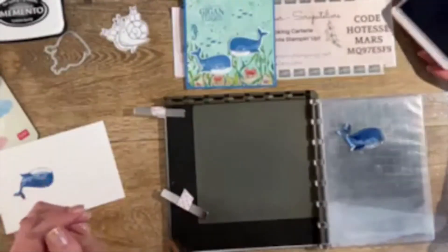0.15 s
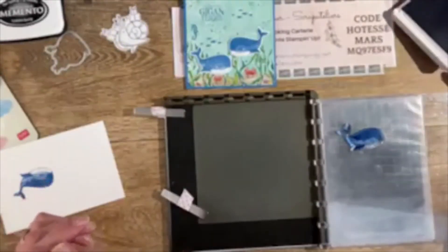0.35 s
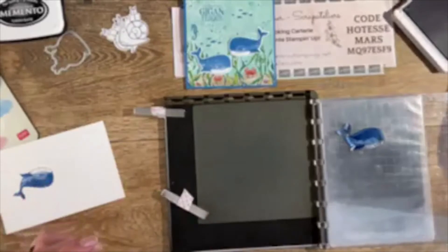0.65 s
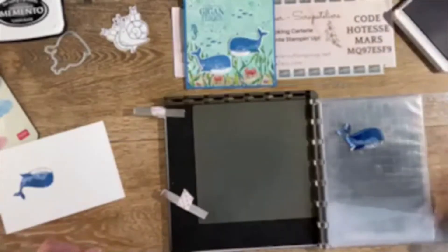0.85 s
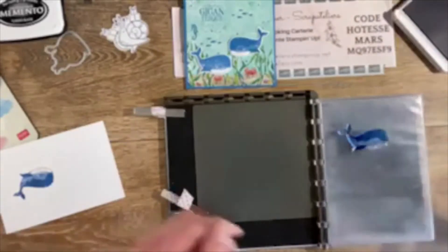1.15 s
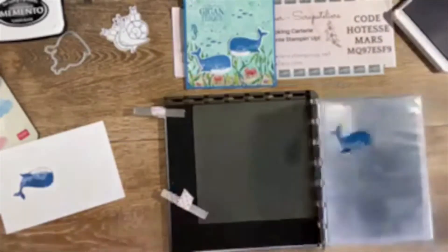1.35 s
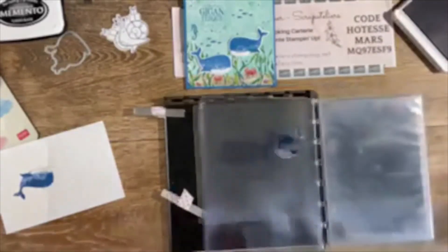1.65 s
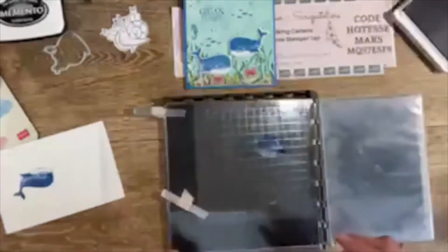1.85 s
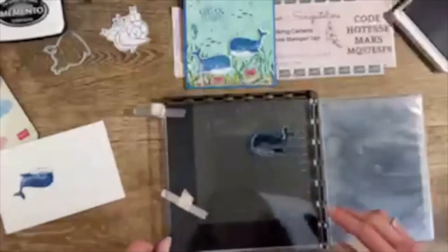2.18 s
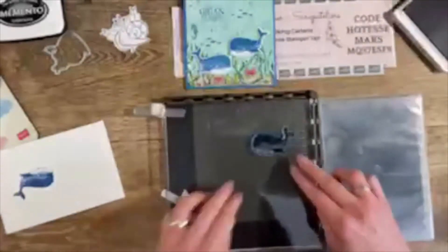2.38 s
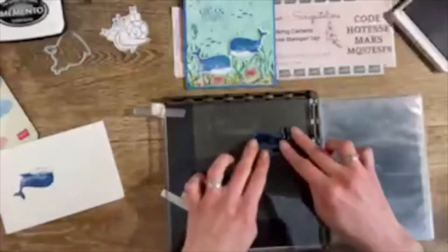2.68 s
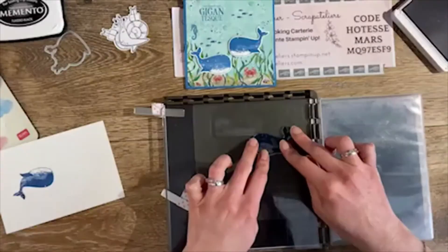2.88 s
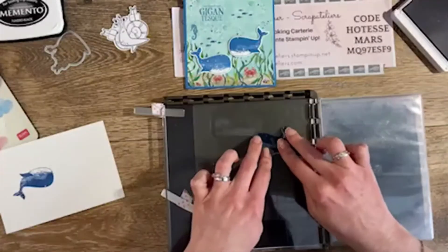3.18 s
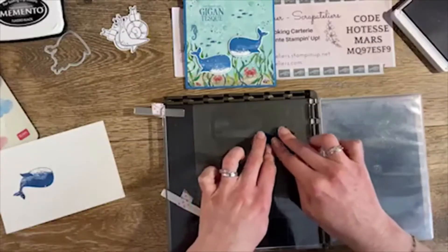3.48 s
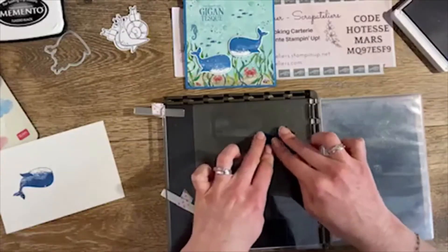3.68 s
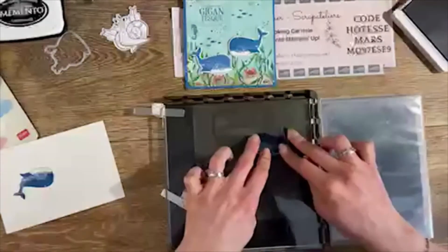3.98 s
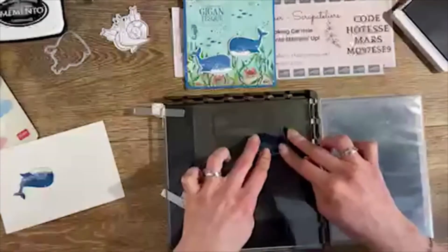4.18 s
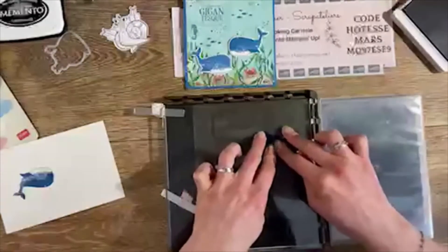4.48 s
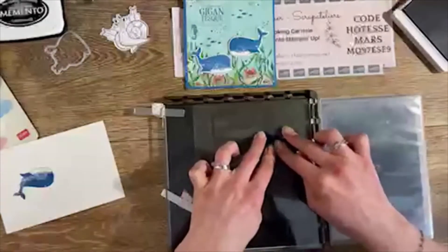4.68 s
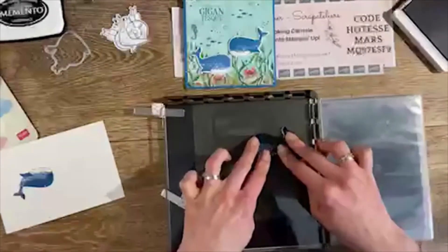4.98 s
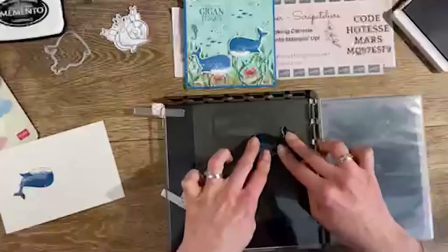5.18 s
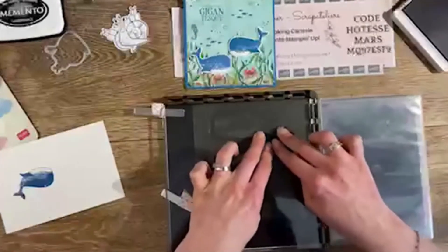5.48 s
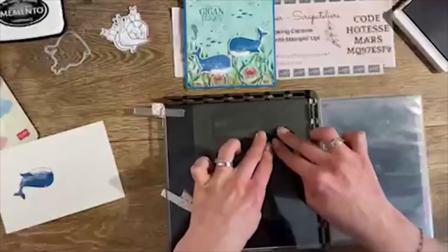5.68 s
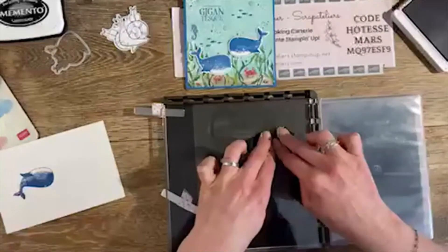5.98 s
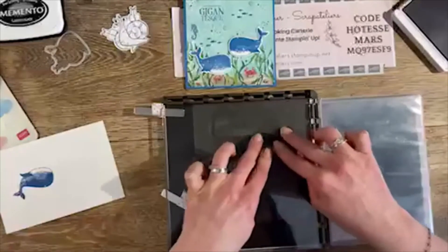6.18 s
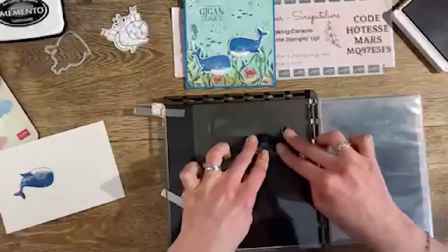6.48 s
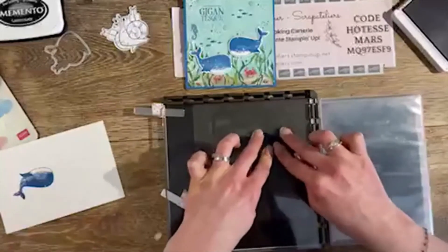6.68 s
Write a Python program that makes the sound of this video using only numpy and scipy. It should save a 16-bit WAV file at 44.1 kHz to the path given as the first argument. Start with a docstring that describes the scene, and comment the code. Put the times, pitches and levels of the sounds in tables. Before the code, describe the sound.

Three hard plastic clacks tap onto rubber with a low table thump, then a sticky hiss and faint fingertip ticks in a quiet room.

```python
"""Ink pad and stamping platform

On a wooden table in a small room, an ink pad in a plastic case is tapped three times onto a rubber stamp.
Damped modes make the case's clack and the table's thump; dense noise bursts fill in the crack of each blow.
The pad peels off with a grainy hiss and is set aside; fingertips press the folded lid with ticks, soft bumps,
creaks and slides. Room noise lies under it all, and a small microphone loses the deepest bass."""
import sys
import numpy as np
from scipy import signal
from scipy.fft import rfft, irfft
from scipy.io import wavfile

SR = 44100
rng = np.random.default_rng(int(sys.argv[2]) if len(sys.argv) > 2 else 0)


def materialize(psi):
    """Save the field psi as 16-bit PCM at rate SR to the path in sys.argv[1].

    A 1-D psi becomes a single channel; in a 2-D psi each row is a channel.
    """
    bounded = np.clip(np.atleast_2d(psi).T, -1, 1)
    quanta = np.round(bounded * 32767).astype(np.int16)
    wavfile.write(sys.argv[1], SR, quanta)


N = 301820
RING = np.arange(SR * 3 // 4) / SR  # time axis of one sound, s

# quiet noise of the room [f/Hz, relative density/dB per Hz]
AIR_COLOUR = [(20, -9), (45, -6), (70, 1), (105, 1.5), (160, -4), (290, -9), (390, -5), (520, -11),
              (900, -16.5), (2000, -22), (5000, -26), (7500, -27.5), (10000, -34), (16000, -40)]
AIR_DB = -68
# reverberation by band [f/Hz, t60/s, level against the sound fed to the room/dB]
ROOM_BANDS = [(100, 0.4, -7.5), (348, 0.35, -0.5), (970, 0.41, -8), (1800, 0.45, -12.5), (4001, 0.46, -12),
              (7900, .35, -13.5), (14000, .25, -16.5)]

# hands lean and shuffle on the table [middle t/s, length/s, level/dB]
RUMBLES = [(1.35, .36, -67.5), (1.7, .16, -66), (3.98, .15, -71), (4.36, .15, -64.5), (5.57, 0.1, -59),
           (5.78, 0.078, -67), (6.15, .08, -66)]
# the table's soft thud [f/Hz, level/dB]
THUD_COLOUR = [(35, -9), (70, 6), (110, 3), (160, 3), (260, -8), (450, -11), (1500, -78)]
# hands and plastic sliding [middle t/s, length/s, level/dB, hiss/dB]
SLIDES = [(.08, 1, -69.5, 7), (1.403, 0.26, -76, 1), (1.846, 0.41, -78, 7), (2.578, 0.11, -77, 15),
          (3.45, 0.23, -78, -5), (3.8, .2, -80.5, -12), (4.151, 0.19, -73.5, -15),
          (4.784, 0.092, -73, -21.5), (5.56, 0.17, -73.5, -6.5), (6.634, 0.19, -75, -6)]
# a fingertip's rub on the lid [f/Hz, level/dB]
RUB_COLOUR = [(400, -39), (850, -0.5), (1300, -3), (2000, -12), (2700, -13), (6000, -30), (12000, -50.5)]
# hiss of sliding plastic [f/Hz, level/dB]
HISS_COLOUR = [(1000, -18), (3000, -1), (7500, -0.5), (10000, -7.5), (15000, -8)]
# fingers drag on the lid in short creaks [start t/s, length/s, level/dB, treble/dB]
CREAKS = [(4.116, 0.051, -67.5, -14), (4.183, .028, -66, -17), (4.289, .035, -69.5, -8),
          (4.488, 0.012, -64, -2.5), (5.234, 0.037, -62.5, -12), (5.386, 0.034, -74, -14),
          (5.511, .022, -68, -3), (5.539, 0.0255, -61.5, 2), (5.752, 0.024, -67.5, -15),
          (6.179, 0.019, -61.5, -3), (6.613, 0.04, -64, -17)]
# resonances of the lid under a pressing finger [f/Hz, width/Hz, level/dB]
PRESSED_LID = [(880, 44, -3), (1000, 130, -4), (1176, 100, 9), (1616, 120, 0.5), (2050, 130, -10),
               (2570, 110, -4.5), (3460, 200, -17)]
SLIPS_PER_S = 530  # mean rate at which dragging skin slips

# clear bumps of hands and lid [t/s, level/dB, weight 0 grazing - 1 leaning]
BUMPS = [(1.624, -50, 0.23), (2.141, -58, 0.4), (2.892, -53, 0.33), (4.307, -67, 0.6), (5.035, -68, .62),
         (5.238, -58.5, 0.28), (5.55, -56.5, 0.35), (5.754, -64.5, 0.53), (5.861, -61.5, 0.35),
         (6.115, -59, 0.3), (6.565, -57.5, 0.26), (6.61, -52, 0.17)]
# the hands shift and settle [middle t/s, length/s, level of each small bump/dB, weight 0 - 1]
SHIFTS = [(1.323, 0.0199, -60.5, 0.28), (2.915, 0.029, -60.5, 0.48), (5.26, 0.0201, -64.5, 0.39),
          (5.46, .16, -68.5, 0.58), (6.698, 0.16, -69.5, 0.59)]
TOUCHES_PER_S = 16  # small bumps of a shifting hand, at least one per shift
# the platform's hollow knock [f/Hz, level/dB]
KNOCK_COLOUR = [(150, -21), (370, 8), (520, -1), (730, 0), (1100, -2), (3000, -62)]
WEIGHT_DB = 30  # weight trades rub for thud, over its whole range

# the tacky rubber crackles in small clear ticks [t/s, level/dB]
CRACKLES = [(3.224, -63), (3.237, -55.5), (3.264, -54), (3.287, -60), (3.298, -56), (3.405, -61),
            (3.475, -62)]
# tiny crackles between the clear ones [start t/s, length/s, level/dB, rate/per s]
FIZZ = [(3.23, 0.12, -78.5, 50), (3.394, .17, -74.5, 60)]
# clear ticks of plastic and fingernails [t/s, level/dB, hardness 0 fingertip - 1 nail tip]
TICKS = [(0.143, -47, 0.6), (0.3062, -42.5, 0.41), (1.037, -61, 0.38), (1.047, -58.5, 0.34),
         (1.175, -60, 0.1), (1.624, -53.5, 0.56), (2.538, -49, 1), (2.768, -52.5, 0.48),
         (2.785, -61.5, 0.54), (3.04, -59, 0.54), (3.05, -44, 0.45), (3.368, -57, 0.47),
         (3.449, -58, 0.053), (3.525, -60, 0.45), (3.938, -58, 0.039), (4.078, -61, 0.27),
         (4.087, -53.5, 0.18), (4.092, -58, 0.36), (4.113, -56.5, .25), (4.118, -55.5, .15),
         (4.479, -50, 0.03), (4.791, -61, .05), (4.948, -54.5, 0.04), (5.0954, -40.5, 0.43),
         (5.0998, -43.5, 0.47), (5.423, -67.5, 0.047), (6.204, -60.5, 0.052)]
# modes of the clear lid [f/Hz, t60/s, level/dB]
LID_MODES = [(897, 0.05, -5), (1180, 0.027, 4), (1375, 0.04814, -4.5), (1692, 0.018, 5.5),
             (1860, 0.034, -2), (2054, 0.046, -2)]
# thin high modes of the lid that a nail sets off [f/Hz, t60/s, level/dB]
LID_HIGH_MODES = [(3050, .035, -1), (4270, .03, -5.5), (4452, .03, -5.5), (5994, .03, -6),
                  (6800, 0.038, -6), (7900, .03, -5)]
SPOT_DETUNE = .035  # pitch spread between spots on the lid, share of each mode's pitch
# a nail's snap [f/Hz, level/dB]
SNAP_COLOUR = [(500, -16), (2200, -12), (3000, 1.5), (3700, -5.5), (4800, -3), (6800, -6), (9000, -15),
               (15000, -35)]
# crisp top of a hard contact [f/Hz, level/dB]
CRISP_COLOUR = [(4000, -22), (8000, -3.5), (11000, -5.5), (15000, -7)]
# a harder contact trades the lid's ring for snap, dB over the whole range of hardness
HARD_RING_DB, HARD_SNAP_DB, HARD_CRISP_DB = -17.5, 23, 30.5

# thin, high, beating chirps [t/s, f/Hz, level/dB, t60/s]
CHIRPS = [(0.1455, 5980, -40, 0.058), (4.478, 4160, -57, .045)]
# a chirp's close, beating partials [multiple of its pitch, level/dB]
CHIRP_PARTIALS = [(.975, -9), (1, -2), (1.035, -9)]
# the pad is set down, one corner after the other [t/s, level/dB, lowest ring f/Hz, treble/dB]
SET_DOWN = [(1.0585, -42, 560, -11), (1.0975, -43, 790, -1)]
# modes of a corner on the wood [multiple of the lowest ring, t60/s, level/dB]
CORNER_MODES = [(1, 0.019, 0), (1.25, .028, -7.5), (2.4, 0.021, -7), (4, .025, -13)]

PEEL_S = .769  # the pad lifts off the stamp, s
# strength of the lifting hiss [t/s, level/dB]
PEEL_LEVEL = [(.766, -85.5), (.772, -55), (.803, -55.5), (.85, -59), (.88, -64.5), (.94, -63.5), (.98, -76),
              (1.02, -100)]
# the hollow case colours the hiss as it lifts [f/Hz, width/Hz, level/dB]
PEEL_RINGS = [(819, 365, 0.5), (1158, 62, 9), (1798, 200, 2.5), (2590, 160, -2), (3120, 260, -2),
              (3720, 110, -12), (4445, 67, -3), (5590, 100, -8)]
# open hiss of the peel, and the noise that feeds the hollow case [f/Hz, level/dB]
PEEL_HISS = [(300, 0.5), (1200, -0.5), (3500, -5.0), (4500, -14), (7000, -8.5), (10000, -22), (15000, -25)]
PEEL_FEED = [(500, -3.5), (3500, 6), (9000, -3.5)]

# taps of the pad [t/s, level/dB, treble/dB, table thump/dB, strike place 0 flat - 1 on its edge]
TAPS = [(0.1093, -12.5, -10, -1, 0.013), (0.3183, -2.5, 1, -6, 0.92), (0.5403, 0, 0, 0.5, 0.22)]
# the case rebounds and rattles to rest [t/s, level/dB, treble/dB, table thump/dB, strike place 0 - 1]
REBOUNDS = [(0.1327, -22, -9.5, -10, 0), (0.1424, -25, -12, -6, .1), (0.156, -29, -16, -4, .1),
            (0.3329, -21, -11.5, -6, 0.1), (0.3996, -18, -8.5, -6, 0.82), (0.5678, -11.5, -1.5, 4, 0.3),
            (.5703, -6, -4, -8, 0.68), (0.5743, -16, -5, -10, 0.49), (0.5825, -14.5, -5, -10, 0.3),
            (0.5997, -21, -2, -10, 0.66)]
CONTACT_DB = -31.5  # crisp first touch, the same at every tap
# modes of the case on the stamp [f/Hz, t60/s, level struck flat/dB, level struck on its edge/dB]
CASE_MODES = [(367, 0.07, -17, -26.5), (428, 0.06, -22.5, -24), (522, 0.05, -22.5, -26.5),
              (747, .02, -25.5, -13), (935, 0.048, -17.5, -33), (1035, 0.064, -28.5, -35.5),
              (1310.5, 0.028, -25.5, -19.5), (1530, 0.024, -20, -18), (1695, 0.022, -20, -11),
              (1890, 0.047, -18, -25), (2061.4, 0.025, -20.5, -12.5), (2540, 0.056, -27.5, -30.5),
              (2923, 0.029, -25.5, -14.5), (3405, .022, -29.5, -20.5), (3250, 0.02, -26.5, -14.5),
              (4500, 0.02, -25, -19.5), (3990, 0.0067, -28.5, -30.5), (5560, 0.024, -30, -26.5),
              (7700, 0.017, -32.5, -33.5)]
DETUNE = .009  # the grip detunes the case from blow to blow: spread as a share of each mode's pitch
# dense overtones of the case [f/Hz, level/dB]
CRACK_COLOUR = [(40, -65.5), (130, -25), (270, -19), (390, -6.5), (650, -9), (1000, -5), (1750, 1.5),
                (2400, -6), (3400, -5.5), (5000, -12), (7000, -15.5), (9000, -25), (15000, -35.5)]
# modes of the table top [f/Hz, t60/s, level/dB]
TABLE_MODES = [(73.6, .22, -43), (105.9, .16, -23), (120, 0.11225, -25), (148, 0.1, -22.5),
               (202, .09, -42.5), (217.1, 0.058, -41)]


def undb(db):
    """Decibels to gain."""
    return 10 ** (np.asarray(db) / 20)


def fade(t60):
    """Exponential decay, 60 dB down after t60 seconds."""
    return np.exp(-np.log(1000) * RING / t60)


def rise(rise_s):
    """Exponential build-up as a blow spreads through the material."""
    return 1 - np.exp(-RING / rise_s)


def add(track, s, sound):
    """Mix a sound into the track at time s."""
    i = int(s * SR)
    track[i:i + len(sound)] += sound[:N - i]


def unit(x):
    """Scale to a standard deviation of one."""
    return x / np.std(x)


def colour(points, size):
    """Gain at every frequency from (Hz, dB) points."""
    hz, db = np.transpose(points)
    log_hz = np.log(np.fft.rfftfreq(size, 1 / SR) + 1)
    return undb(np.interp(log_hz, np.log(hz), db))


def noise(points, size=len(RING)):
    """Noise coloured by (Hz, dB) points."""
    return irfft(rfft(rng.standard_normal(size)) * colour(points, size), size)


def ring(modes, rise_s, scatter=1):
    """Damped (Hz, t60, dB) modes that build up as the blow spreads; scatter 0 starts them all in step."""
    phases = scatter * rng.uniform(0, 2 * np.pi, len(modes))
    tones = 0
    for (hz, t60, db), phase in zip(modes, phases):
        tones = tones + undb(db) * fade(t60) * np.sin(2 * np.pi * hz * RING + phase)
    return tones * rise(rise_s)


def burst(points, t60, rise_s):
    """Modes too dense to tell apart: a decaying puff of coloured noise."""
    return noise(points) * fade(t60) * rise(rise_s)


def shelf(x, treble_db, corner_hz):
    """Raise or lower the sound above the corner: a harder contact is brighter."""
    low = signal.sosfilt(signal.butter(5, corner_hz, "low", fs=SR, output="sos"), x)
    high = signal.sosfilt(signal.butter(5, corner_hz, "high", fs=SR, output="sos"), x)
    return low + undb(treble_db) * high


def grainy(x, grain_db, size=150):
    """Sticky friction catches and slips: the level jumps every size samples."""
    steps = undb(grain_db * rng.standard_normal(len(x) // size + 1))
    return unit(x * np.repeat(steps, size)[:len(x)])


def resonate(x, bands):
    """Pass a sound through (Hz, width Hz, dB) resonances."""
    return sum(undb(db) * signal.lfilter(*signal.iirpeak(hz, hz / width, fs=SR), x) for hz, width, db in bands)


def scattered(start_s, length_s, per_s):
    """Uneven moments that fill a stretch of time."""
    count = max(round(length_s * per_s), 1)
    return start_s + length_s * (np.arange(count) + rng.random(count)) / count


def air(waver_db=-0.3, bass_waver_db=1.16, count=45):
    """Quiet room noise that wavers a little, its bass more than its hiss."""
    places = np.linspace(0, count - 1, N)
    waver = np.interp(places, np.arange(count), rng.standard_normal(count))
    bass_db = bass_waver_db * np.interp(places, np.arange(count), rng.standard_normal(count))
    # the treble cut undoes the bass's waver above the corner
    hush = shelf(unit(noise(AIR_COLOUR, size=N)), -bass_db, corner_hz=550)
    return hush * undb(AIR_DB + waver_db * waver + bass_db)


def room(x, onset_s=.009):
    """Wall reflections thicken within milliseconds and die away at a rate set for each band."""
    log_hz = np.log(np.fft.rfftfreq(len(RING), 1 / SR) + 1)
    centres = np.log([row[0] for row in ROOM_BANDS])
    scatter = rfft(rng.standard_normal(len(RING)))
    tail = 0
    for (hz, t60, db), band in zip(ROOM_BANDS, np.eye(len(ROOM_BANDS))):
        envelope = fade(t60) * (1 - np.exp(-(RING / onset_s) ** 2))
        share = np.interp(log_hz, centres, band)  # overlapping bands that sum to one
        reflections = irfft(scatter * share, len(RING))
        tail = tail + undb(db) * reflections * envelope / np.linalg.norm(envelope)
    return signal.fftconvolve(x, tail)[:N]


def rumbles():
    """The table rumbles softly while weight shifts on it: grainy low noise that swells and fades."""
    out = np.zeros(N)
    for s, length_s, db in RUMBLES:
        swell = np.sin(np.pi * np.clip(RING / length_s, 0, 1))
        add(out, s - length_s / 2, undb(db) * grainy(noise(THUD_COLOUR), grain_db=3, size=900) * swell)
    return out


def slides():
    """Skin and plastic slide softly: grainy friction noise, swelling and dying away."""
    out = np.zeros(N)
    for s, length_s, db, hiss_db in SLIDES:
        start = max(s - length_s / 2, 0)
        swell = np.cos(np.pi * np.clip((start + RING - s) / length_s, -.5, .5))
        friction = unit(noise(RUB_COLOUR)) + undb(hiss_db) * unit(noise(HISS_COLOUR))
        add(out, start, undb(db) * grainy(friction, grain_db=2) * swell)
    return out


def creaks(slip_spread_db=4, edge_s=0.0034):
    """Skin sticks and slips on the lid; every slip rings it."""
    out = np.zeros(N)
    for s, length_s, db, treble_db in CREAKS:
        slipping = rng.random(len(RING)) < SLIPS_PER_S / SR
        slips = slipping * undb(slip_spread_db * rng.standard_normal(len(RING)))
        drag = np.clip(np.minimum(RING, length_s - RING) / edge_s, 0, 1)
        # the tiny offset keeps the filters clear of vanishing numbers
        creak = resonate(slips * drag + 1e-18, PRESSED_LID) / np.std(resonate(slips, PRESSED_LID))
        add(out, s, undb(db) * shelf(creak, treble_db, corner_hz=2090))
    return out


def bump(weight, rub_db=4.5, knock_db=20, thud_db=27):
    """A soft contact: skin rubs on the lid, the platform knocks and the table thuds under it."""
    lean_db = WEIGHT_DB * (weight - .5)
    rub = undb(rub_db - lean_db) * burst(RUB_COLOUR, t60=0.067, rise_s=0.0009)
    knock = undb(knock_db) * burst(KNOCK_COLOUR, t60=0.057, rise_s=0.0022)
    thud = undb(thud_db + lean_db) * burst(THUD_COLOUR, t60=0.21, rise_s=0.0045)
    return rub + knock + thud


def bumps():
    """The clear bumps, and small ones at random whenever the hands shift."""
    out = np.zeros(N)
    for s, db, weight in BUMPS:
        add(out, s, undb(db) * bump(weight))
    for middle_s, length_s, db, weight in SHIFTS:
        for s in scattered(middle_s - length_s / 2, length_s, TOUCHES_PER_S):
            add(out, s, undb(db) * bump(weight))
    return out


def at_a_spot(modes, spread_db):
    """Lid modes as one random spot excites them, shifted in pitch and level."""
    return [(hz * (1 + SPOT_DETUNE * rng.standard_normal()), t60, db + spread_db * rng.standard_normal())
            for hz, t60, db in modes]


def tick(lid_db, snap_db, crisp_db, high_db=-18, spread_db=3):
    """A hard little contact: the lid rings under a bright snap, differently at every spot."""
    lid = undb(lid_db) * ring(at_a_spot(LID_MODES, spread_db), rise_s=0.0002)
    high = undb(snap_db + high_db) * ring(at_a_spot(LID_HIGH_MODES, spread_db), rise_s=.0005)
    snap = undb(snap_db) * burst(SNAP_COLOUR, t60=0.04, rise_s=0.00046)
    crisp = undb(crisp_db) * burst(CRISP_COLOUR, t60=.03, rise_s=0.00075)
    return lid + high + snap + crisp


def crackles(lid_db=-5, snap_db=10, crisp_db=10, spread_db=3):
    """Very crisp little ticks from the tacky rubber, with a fizz of tiny ones between."""
    out = np.zeros(N)
    tiny = []
    for start_s, length_s, db, per_s in FIZZ:
        for s in scattered(start_s, length_s, per_s):
            tiny.append((s, db + spread_db * rng.standard_normal()))
    for s, db in CRACKLES + tiny:
        add(out, s, undb(db) * tick(lid_db, snap_db, crisp_db))
    return out


def ticks(lid_db=-5.0, snap_db=-5, crisp_db=-21):
    """Fingertips ring the lid; nails snap, so hardness moves level from the ring to the snap."""
    out = np.zeros(N)
    for s, db, hard in TICKS:
        contact = tick(lid_db + HARD_RING_DB * hard ** 3,
                       snap_db + HARD_SNAP_DB * hard,
                       crisp_db + HARD_CRISP_DB * hard)
        add(out, s, undb(db) * contact)
    return out


def chirps():
    """A thin, beating chirp of close partials."""
    out = np.zeros(N)
    for s, hz, db, t60 in CHIRPS:
        partials = [(hz * multiple, t60, part_db) for multiple, part_db in CHIRP_PARTIALS]
        add(out, s, undb(db) * ring(partials, rise_s=0.0025))
    return out


def crack(evenness, t60=.027):
    """The case's dense overtones; evenness 0 leaves their peaks and dips, 1 levels them."""
    spectrum = rfft(burst(CRACK_COLOUR, t60, rise_s=.0009))
    ripple = np.abs(spectrum) / colour(CRACK_COLOUR, len(RING)) + 1e-9
    evened = irfft(spectrum / (ripple / np.median(ripple)) ** evenness, len(RING))
    return evened * (RING < 2 * t60)


def set_down(crack_db=-3):
    """Two short, hollow knocks as the pad is put aside: corner modes with a crack of overtones."""
    out = np.zeros(N)
    for s, db, hz, treble_db in SET_DOWN:
        modes = [(hz * multiple, t60, mode_db) for multiple, t60, mode_db in CORNER_MODES]
        knock = ring(modes, rise_s=0.00035) + undb(crack_db) * crack(evenness=.5)
        add(out, s, undb(db) * shelf(knock, treble_db, corner_hz=1200))
    return out


def peel(hiss_db=-3):
    """The wet pad lets go of the rubber: a grainy hiss, coloured by the case, stops as the pad clears."""
    out = np.zeros(N)
    hiss = unit(noise(PEEL_HISS))
    hollow = unit(resonate(noise(PEEL_FEED), PEEL_RINGS))
    swell = undb(np.interp(PEEL_S + RING, *np.transpose(PEEL_LEVEL)))
    add(out, PEEL_S, grainy(hollow + undb(hiss_db) * hiss, grain_db=2, size=200) * swell)
    return out


def blow(db, treble_db, thump_db, edge, ring_db, crack_db, table_db, evenness):
    """One blow rings the case by where it lands; the heavy table builds up more slowly."""
    edge = np.clip(edge, 0, 1)
    modes = []
    for hz, t60, flat_db, edge_db in CASE_MODES:
        detuned_hz = hz * (1 + DETUNE * rng.standard_normal())
        modes.append((detuned_hz, t60, flat_db + edge * (edge_db - flat_db)))
    clack = undb(ring_db) * ring(modes, rise_s=0.00084) + undb(crack_db) * crack(evenness)
    thump = undb(table_db + thump_db) * ring(TABLE_MODES, rise_s=0.0087, scatter=0)
    return undb(db) * (shelf(clack, treble_db, corner_hz=2256) + thump)


def ink_pad(ring_db, crack_db, table_db, evenness):
    """Each tap lands with a crisp tick, then the case rattles to rest in smaller blows."""
    out = np.zeros(N)
    mix = ring_db, crack_db, table_db, evenness
    for s, db, treble_db, thump_db, edge in TAPS:
        touch = undb(CONTACT_DB) * burst(CRISP_COLOUR, t60=0.03, rise_s=.0005)
        add(out, s, blow(db, treble_db, thump_db, edge, *mix) + touch)
    for s, db, treble_db, thump_db, edge in REBOUNDS:
        add(out, s, blow(db, treble_db, thump_db, edge, *mix))
    return out


def scene():
    """Everything on the table, heard directly and through the room, over the room noise."""
    handling = rumbles() + slides() + creaks() + bumps() + crackles() + ticks() + set_down() + peel()
    direct = ink_pad(ring_db=3.5, crack_db=2.5, table_db=1.0, evenness=.5) + chirps() + handling
    # the walls collect the case's sound from all directions, which evens out its resonances
    all_round = ink_pad(ring_db=-12, crack_db=5.5, table_db=-5.5, evenness=1) + undb(-2.5) * handling
    return (direct + room(all_round) + air())[None]


def record(dry):
    """The small microphone loses the deepest bass below 64 Hz; the recorder cuts the top above 15.9 kHz."""
    thin = signal.sosfilt(signal.butter(4, 64, "highpass", fs=SR, output="sos"), dry)
    return signal.sosfilt(signal.ellip(10, .2, 70, 15900, fs=SR, output="sos"), thin)


dry = scene()
out = record(dry)
materialize(out)
```